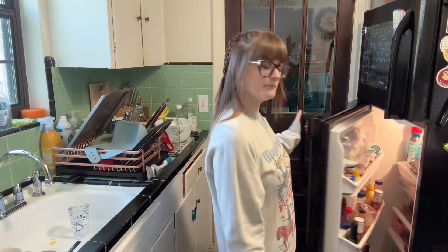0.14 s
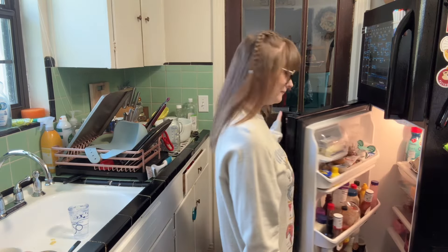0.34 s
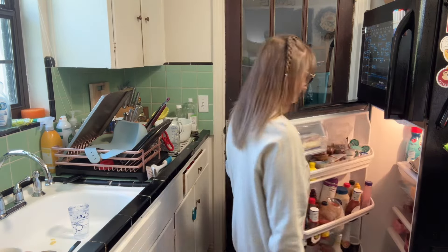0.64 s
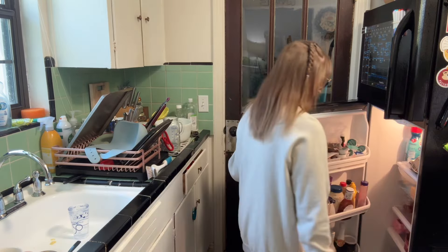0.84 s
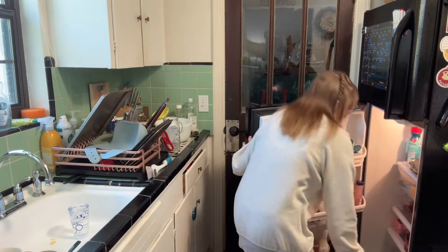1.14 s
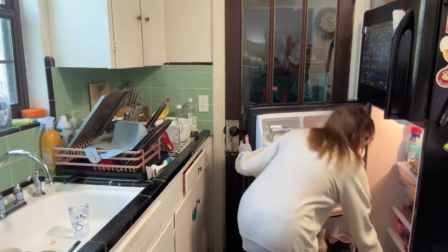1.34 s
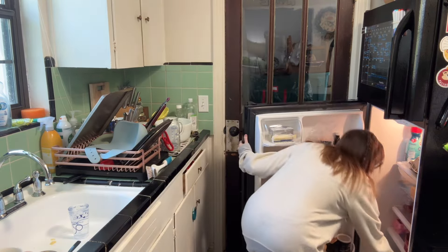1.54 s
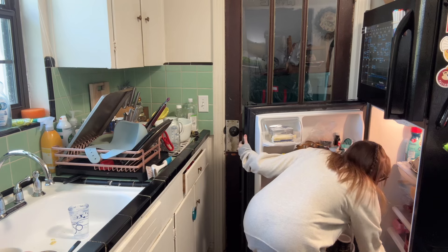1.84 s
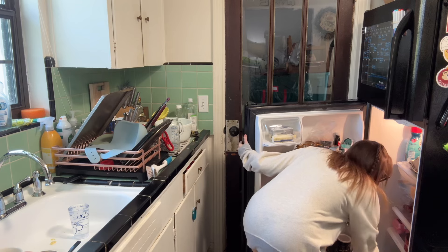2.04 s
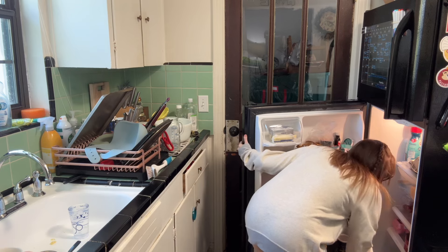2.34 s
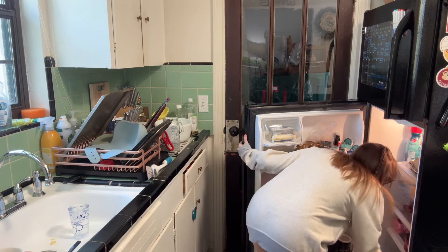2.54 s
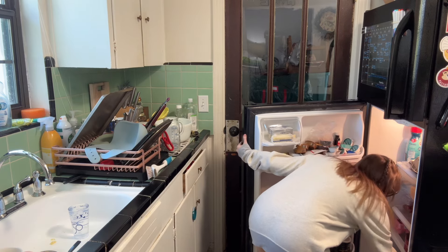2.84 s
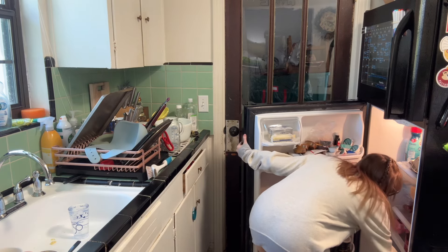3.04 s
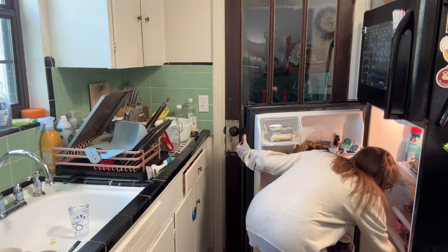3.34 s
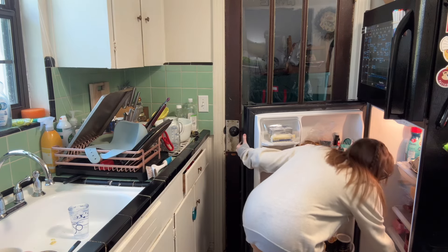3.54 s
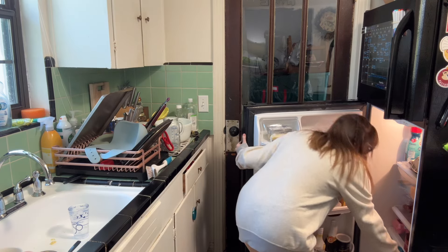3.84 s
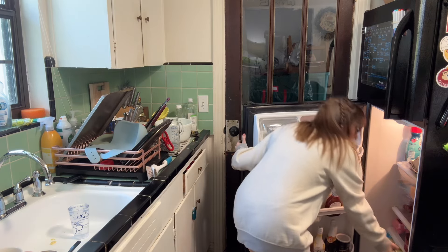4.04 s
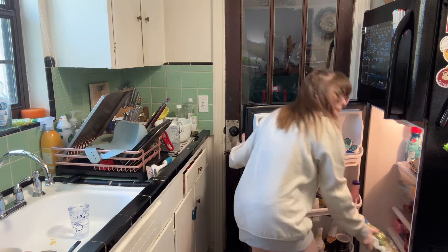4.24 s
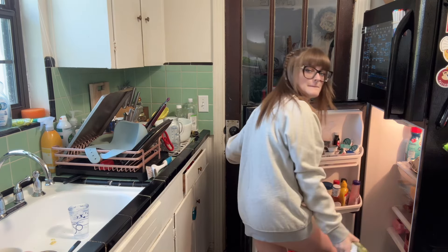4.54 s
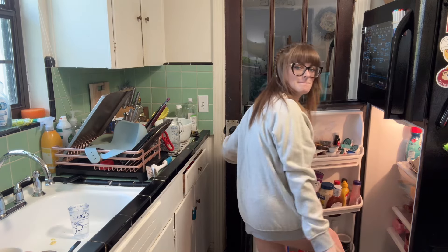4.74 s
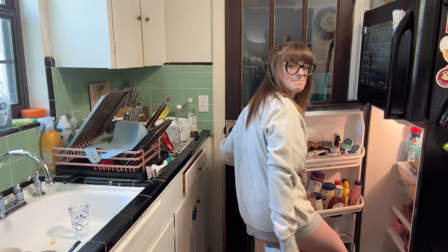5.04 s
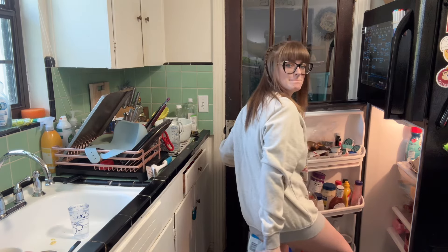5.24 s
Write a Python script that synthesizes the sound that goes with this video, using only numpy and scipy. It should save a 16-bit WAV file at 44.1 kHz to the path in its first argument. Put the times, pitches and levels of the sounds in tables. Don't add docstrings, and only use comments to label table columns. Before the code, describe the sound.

Close, slightly overloaded pickup of someone rummaging in an open fridge, with a short kitchen echo and a quiet compressor hum. Soft glass clinks and a jar rattle come first, then a loud plastic drawer bang and scraping, dense crackling of plastic bags with sharp pops, a second heavy knock, and finally light lid clicks and boxes sliding.

```python
import sys
import numpy as np
from scipy import signal
from scipy.fft import rfft, irfft
from scipy.io import wavfile

SR = 44100
rng = np.random.default_rng(int(sys.argv[2]) if len(sys.argv) > 2 else 0)


def to_wav(sig):
    pcm = np.clip(np.atleast_2d(sig), -1, 1) * 32767
    pcm = np.round(pcm).astype(np.int16)
    wavfile.write(sys.argv[1], SR, pcm.T)


def ratio(d):
    e = np.asarray(d, float) / 20
    return 10 ** e


N = 238253

# (frequency [Hz], density [dB per Hz])
HUM_SPECTRUM = [(11, -20), (18, 10.5), (45, -1), (88, -23), (196, -10), (300, -16.5), (788, -17.5),
                (1110, -26), (2670, -30.5), (5280, -41), (7860, -42), (14700, -47), (16000, -58)]
HUM_DB, WHINE_HZ, WHINE_DB = -48, 1166, -69

# (time [s], ring [dB], shrill [dB], rattle t60 [s])
JAR_CLINKS = [
    (.182, -38, -43.5, 0.14),
    (.355, -34.5, -43, 0.24),
]
# (time [s], ring [dB], shrill [dB], rattle t60 [s])
SHELF_JOLT = [
    (.743, -18, -31, 0.2),
]
# (frequency [Hz], level [dB], t60 [s])
FIRST_JAR_MODES = [(1700, -3, .07), (1800, 4, .1), (2300, -13, .05), (3080, -3, .09), (5300, -15, .04),
                   (8000, -9, .04)]
# (frequency [Hz], level [dB], t60 [s])
SECOND_JAR_MODES = [(1750, -7, .07), (2000, -6, .08), (2380, -1, .08), (2480, -4, .07), (3500, -4, .07),
                    (7500, -9, .05), (8000, -6, .06)]
# (frequency [Hz], level [dB], t60 [s])
SHELF_JAR_MODES = [(765, 2, 0.1), (1080, 2, 0.081), (1190, -15.5, 0.073), (1246, 7.5, 0.026),
                   (1290, -16, 0.055), (1600, 10.5, 0.073), (1560, -24, 0.13), (1830, 0, 0.075),
                   (2110, 4, 0.051), (2320, -20, 0.091), (2790, 6, 0.071), (2800, -13, 0.08),
                   (2990, 3, 0.026), (3560, -3.5, 0.11), (3770, -2, 0.043), (4100, -5, 0.14)]

# (start [s], hold [s], scrape [dB], cabinet rumble over scrape [dB])
DRAG_STROKES = [(0.2, 0.77, -55.5, -1.5), (1.1, 0.31, -66, 10.5), (1.69, .1, -27.5, 5.5),
                (1.8, 0.6, -37.5, -6), (2.03, 0.23, -40.5, 4.5), (2.3, 0.13, -41.5, 14),
                (2.68, 0.2, -37, 1), (2.79, 0.094, -35.5, -12.5), (2.9, 0.15, -35.5, -20),
                (3.15, 0.41, -30, -17), (3.6, .35, -48, 5), (4.0, 0.87, -60.5, 4.5), (4.82, 0.025, -34, 1),
                (4.85, .17, -33, 3), (5.05, 0.28, -36.5, -7), (5.17, 0.18, -33, -2.5), (5.29, .12, -41, -1)]
# (start [s], hold [s], rustle [dB], sheen over rustle [dB])
RUSTLE_STROKES = [(0.2, 0.12, -70.5, 10), (.78, 0.038, -49, -20), (.9, 0.72, -67.5, 8.5),
                  (1.57, .06, -54, -16), (1.76, 0.56, -33.5, -2.5), (2.38, 0.12, -45.5, 4),
                  (2.66, 0.19, -41, 4.5), (2.79, 0.13, -32.5, 3.5), (2.98, 0.19, -36, 6),
                  (3.12, 0.36, -31.5, 3), (3.48, 0.11, -33, 2.5), (3.7, 0.27, -55.5, 10),
                  (4.1, 0.58, -55, -3), (4.79, 0.056, -48, -20), (4.85, 0.3, -41, -22),
                  (4.97, 0.3, -33.5, -26), (5.11, 0.24, -32, -17)]
STROKE_ATTACK_S, STROKE_RELEASE_DB_PER_S, STILL_DB = 0.036, 151.5, -90

# (time [s], crack [dB], box [dB], tray [dB], cabinet [dB])
KNOCK_BLOWS = [(1.5482, -24.5, -14.5, -25.5, -4), (1.7, -15, -18.5, -50, -24), (1.7393, 1, -4, -10, -8),
               (1.758, -3, -6, -33, -33), (1.7845, -29, -7, -16, -19), (1.828, -27, -27, -14, -16),
               (2.145, -26.5, -29, -47, -29), (2.3509, -10, -8.5, -25.5, -48),
               (2.3652, -12, -23, -22, -23.5), (2.3926, -61, -20, -30, -39),
               (2.642, -24, -15.5, -14.5, -32), (2.942, -16, -52, -32, -48),
               (3.064, -26.5, -21.5, -29, -34.5), (3.1078, -19.5, -18, -26, -53),
               (3.4827, 0, -2.5, -5.5, -18.5), (3.514, -28, -14, -15.5, -20),
               (3.7362, -47, -23.5, -28.5, -31), (3.8436, -35, -28.5, -31.5, -56),
               (4.6322, -42, -41, -38.5, -28), (4.8563, -61, -22.5, -24, -38), (4.9268, -45, -18, -23, -32),
               (5.1569, -31, -22.5, -22, -51), (5.184, -53, -37, -23, -23.5)]
KNOCK_T60_S = 0.12
# (frequency [Hz], density [dB per Hz])
CRACK_SPECTRUM = [(240, -37.5), (400, -23.5), (921, -3), (1230, -11), (1870, -5), (2120, -5), (4800, -10),
                  (7630, -9), (16000, -25.5)]
# (frequency [Hz], level [dB], t60 [s])
BOX_MODES = [(516, -4.5, 0.04), (560, -10, 0.084), (607.4, -6.5, 0.061), (678, -3.5, 0.051),
             (766, -1, 0.03), (802, -0.5, 0.031), (915, -8, 0.073), (950, -12.5, 0.065), (972, -6.5, 0.054),
             (1116, -5.5, 0.032), (1245, -14.5, 0.054), (1297, -13, 0.096), (1462, -6.5, 0.027),
             (1532, -13, 0.059), (1549, -13, 0.046), (1670, -18, 0.029), (2320, -17.5, 0.024)]
# (frequency [Hz], level [dB], t60 [s])
TRAY_MODES = [(172, -3, 0.07), (208.4, -1.5, 0.2), (247.3, -7.5, 0.23), (287.5, -0.5, 0.12),
              (336, -4.5, 0.16), (379, -11, 0.19), (430.7, -4, 0.1)]
# (frequency [Hz], level [dB], t60 [s])
CABINET_MODES = [(63.5, -31, 0.16), (79, -19.5, 0.45), (100.7, -3.5, 0.26), (129, 0, 0.18),
                 (211.4, -5.5, 0.2)]

# (frequency [Hz], density [dB per Hz])
FILM_SPECTRUM = [(900, -25), (1500, -3), (3000, -1), (5000, 0), (7000, 0), (9000, -3), (12000, -13),
                 (16000, -21)]
PRICKS_PER_S, PRICK_OVER_SHEEN_DB = 160, 10
# (time [s], level [dB], centre [Hz])
LID_CLICKS = [
    (0.572, -37, 1920),
    (1.0198, -43, 2720),
    (1.422, -20, 1940),
    (4.1833, -29, 1940),
    (4.284, -25.5, 2770),
    (4.504, -41, 2420),
    (4.53, -31, 2590),
    (4.5817, -25, 3430),
    (4.6068, -26, 4150),
    (5.22, -28, 4170),
]
# (time [s], level [dB], centre [Hz])
BAG_SNAPS = [(2.5756, -46, 7290), (2.6978, -20, 6100), (2.7292, -43, 8200), (2.7561, -25, 5900),
             (2.7871, -19, 6500), (2.8265, -20, 4930), (2.8674, -17, 8050), (2.944, -4, 4430),
             (3.022, -14.5, 8400), (3.1096, -7, 8050), (3.1542, -10, 6030), (3.1864, -19.5, 6640),
             (3.2296, -13, 5730), (3.244, -18, 5440), (3.2879, -24, 8350), (3.311, -17, 5760),
             (3.4291, -10, 8150), (3.5956, -21, 7100), (3.6576, -28.5, 5460), (3.6794, -47, 6020),
             (3.8277, -27.5, 5950), (3.8433, -12, 6390), (3.916, -20.5, 6700), (4.0085, -26.5, 5600),
             (4.0335, -46, 6300), (4.1639, -45.5, 5800)]
# (time [s], level [dB], centre [Hz])
BOX_SCUFFS = [
    (4.855, -23.5, 1870),
    (4.924, -17.5, 2430),
]
SNAP_T60_S, CLICK_T60_S, SCUFF_T60_S = 0.12, 0.037, 0.28
SHORTENS_PER_DB = 0.0748
# (time [s], level [dB], length [s])
SWISHES = [
    (1.176, -47, 0.1),
    (1.623, -53.5, 0.052),
    (2.135, -30.5, 0.056),
    (3.365, -31, 0.062),
    (4.581, -58, 0.1),
    (5.103, -42, 0.076),
]
# (time [s], peak [dB])
EDGE_TICKS = [
    (2.9455, -10),
    (3.0236, -4),
    (3.1096, -6),
    (3.1545, -18),
    (3.8432, -12),
    (3.9165, -20),
    (4.2845, -37),
]

# (frequency [Hz], t60 [s])
KITCHEN_DECAY = [(100, 0.79), (600, 0.31), (2500, 0.3), (8000, 0.11), (16000, 0.25)]
KITCHEN_DB = -13.5


def rms_one(x):
    return x / np.sqrt(np.mean(x ** 2) + 1e-20)


def at_hz(points, hz):
    table_hz, value = np.transpose(points)
    return np.interp(np.log(hz + 1), np.log(table_hz), value)


def colour(x, spectrum):
    log_level = at_hz(spectrum, np.arange(2049) * SR / 4096) * np.log(10) / 20
    cepstrum = irfft(log_level)
    cepstrum[1:2048] *= 2
    cepstrum[2049:] = 0
    pulse = irfft(np.exp(rfft(cepstrum)))
    return signal.oaconvolve(x, pulse / np.linalg.norm(pulse))[:N]


def band(x, low_hz, high_hz):
    edges_hz = [low_hz, min(high_hz, 0.45 * SR)]
    return signal.sosfilt(signal.butter(2, edges_hz, "band", fs=SR, output="sos"), x)


def drift(rate_hz):
    knots = rng.standard_normal(2000)
    return np.interp(np.arange(N) / SR * rate_hz, np.arange(len(knots)), knots)


def grains(count, spread_db):
    sizes = ratio(spread_db * np.minimum(rng.exponential(1, count), 5))
    return rms_one(sizes * rng.standard_normal(count))


def rattle(time_s, db, t60_s, rise_s=0.0012):
    out = np.zeros(N)
    for start_s, level_db, decay_s in zip(time_s, db, np.clip(t60_s, 0.004, 0.5)):
        first = round(start_s * SR)
        t = np.arange(N - first)[:SR // 2] / SR
        out[first:first + len(t)] += ratio(level_db - 60 * t / decay_s) * (1 - np.exp(-t / rise_s))
    return out


def first_touch(time_s, db):
    out = np.zeros(N)
    out[np.round(np.asarray(time_s) * SR).astype(int) + 8] = ratio(db)
    return out


def body(drive, modes, spread_db, flip=-1):
    out = np.zeros(N)
    for k, (hz, db, t60_s) in enumerate(modes):
        r = ratio(-60 / (np.clip(t60_s, 0.02, 0.3) * SR))
        w = 2 * np.pi * hz / SR
        push = drive * ratio(db + spread_db * drift(17)) * flip ** k + 1e-18
        out += signal.lfilter([0, np.sin(w)], [1, -2 * r * np.cos(w), r * r], push)
    return out


def strokes(rows):
    start_s, hold_s, db, second_db = np.transpose(rows)[:, :, None]
    t = np.arange(0, N, 64) / SR
    swell = np.clip((t - start_s) / STROKE_ATTACK_S, 0, 1)
    shape = swell * ratio(-STROKE_RELEASE_DB_PER_S * np.maximum(t - start_s - hold_s, 0))
    levels_db = []
    for peak_db in (db, db + second_db):
        power = np.sum((shape * ratio(peak_db)) ** 2, axis=0) + ratio(STILL_DB) ** 2
        levels_db.append(np.interp(np.arange(N) / SR, t, 10 * np.log10(power)))
    return levels_db


def compressor():
    hum = ratio(HUM_DB + drift(3)) * colour(rng.standard_normal(N), HUM_SPECTRUM)
    whine = np.sin(2 * np.pi * WHINE_HZ * np.arange(N) / SR)
    return hum + ratio(WHINE_DB + 3.0 * drift(2.4)) * whine


def clinks(events, modes, ring_share_db):
    time_s, ring_db, shrill_db, t60_s = np.transpose(events)
    touch = grains(N, 2.55)
    drive = rattle(time_s, ring_db, t60_s) * touch + first_touch(time_s, ring_db + 21.0)
    ring = body(ratio(ring_share_db) * drive, modes, spread_db=-2.0)
    tick = band(drive, 670, 2670)
    shrill = rattle(time_s, shrill_db + 1.0, t60_s) * touch
    shrill = band(band(shrill, 6800, 10000), 6300, 10800)
    return ring + tick + shrill


def jars():
    first = clinks(JAR_CLINKS[:1], FIRST_JAR_MODES, ring_share_db=-35)
    second = clinks(JAR_CLINKS[1:], SECOND_JAR_MODES, ring_share_db=-35)
    return first + second + clinks(SHELF_JOLT, SHELF_JAR_MODES, ring_share_db=-44)


def runners(scrape_db, judder):
    return band(ratio(scrape_db + 5) * judder * grains(N, 5.3), 150, 1500)


def boxes(scrape_db, judder):
    time_s, _, box_db, _, _ = np.transpose(KNOCK_BLOWS)
    t60_s = np.full(len(time_s), KNOCK_T60_S)
    drive = rattle(time_s, box_db - 34, 1.62 * t60_s) + ratio(scrape_db - 29.5) * judder
    drive = drive * grains(N, 2.13) + first_touch(time_s, box_db - 8.5)
    return body(drive, BOX_MODES, spread_db=4.0)


def shelf_tray(rumble_db, judder):
    time_s, _, _, tray_db, _ = np.transpose(KNOCK_BLOWS)
    t60_s = np.full(len(time_s), KNOCK_T60_S)
    drive = rattle(time_s, tray_db - 33, 1.17 * t60_s) + ratio(rumble_db - 37.5) * judder
    push = rattle(time_s, tray_db - 33.5, 0.15 * t60_s)
    return body(drive * grains(N, 3.1) + push, TRAY_MODES, spread_db=2.0)


def cabinet(rumble_db):
    time_s, _, _, _, cabinet_db = np.transpose(KNOCK_BLOWS)
    t60_s = np.full(len(time_s), KNOCK_T60_S)
    push = rattle(time_s, cabinet_db - 27.0, 0.075 * t60_s, rise_s=0.00054)
    shake = ratio(rumble_db - 15.5) * band(rng.standard_normal(N), 46.4, 83.5)
    panels = body(shake - push, CABINET_MODES, spread_db=2.0, flip=0.74)
    return band(band(panels, 55, 900), 50, 900)


def bag_rustle(film, rustle_db, sheen_db):
    clumps = ratio(2.4 * drift(45) + 1.8 * drift(160))
    dull = signal.lfilter(*signal.butter(1, 5500, fs=SR), film)
    rustle = ratio(rustle_db - 6.0) * dull * clumps ** 0.45
    sheen = ratio(sheen_db - 3.0) * clumps * (film - dull)
    pricks = (rng.random(N) < PRICKS_PER_S / SR) * rng.standard_normal(N)
    return rustle + sheen + band(ratio(sheen_db + PRICK_OVER_SHEEN_DB) * pricks, 3800, 15000)


def snaps(events, usual_t60_s):
    out = np.zeros(N)
    touch = grains(N, 2.0)
    for time_s, db, hz in events:
        t60_s = usual_t60_s * np.exp(-SHORTENS_PER_DB * (db + 27.5))
        first = round(time_s * SR)
        at = slice(first, first + SR // 4)
        snap = rattle([time_s], [db - 3.5], [t60_s], rise_s=0.0014) * touch
        snap = (snap + first_touch([time_s], [db - 1.5]))[at]
        out[at] += band(band(snap, 0.3 * hz, 1.58 * hz), 300, 3.44 * hz)
    return out


def swishes(film):
    out = np.zeros(N)
    t = np.arange(N) / SR
    for time_s, db, length_s in SWISHES:
        progress = np.clip((t - time_s) / length_s, 0, 1)
        out += ratio(db) * np.sin(np.pi * progress ** 0.65) ** 2 * film
    return out


def knock_cracks():
    time_s, crack_db, _, _, _ = np.transpose(KNOCK_BLOWS)
    envelope = rattle(time_s, crack_db - 4.5, np.full(len(time_s), KNOCK_T60_S))
    return colour(envelope * grains(N, 3.2), CRACK_SPECTRUM)


def edge_ticks():
    return band(first_touch(*np.transpose(EDGE_TICKS)), 1500, 15000)


def kitchen(x):
    t, white = np.arange(SR // 2) / SR, rng.standard_normal(SR // 2)
    tail = np.zeros(len(t))
    for hz in 62.5 * 2 ** np.arange(9):
        octave = band(white, hz / np.sqrt(2), hz * np.sqrt(2))
        tail += octave * ratio(-60 * t / at_hz(KITCHEN_DECAY, hz))
    tail = band(tail * (t > 0.005), 120, 19000)
    return signal.oaconvolve(x, tail / np.linalg.norm(tail))[:N]


def scene():
    hum = compressor()
    scrape_db, rumble_db = strokes(DRAG_STROKES)
    judder = ratio(2.1 * drift(30))
    film = colour(grains(N, 0.78), FILM_SPECTRUM)
    near = jars() + runners(scrape_db, judder) + boxes(scrape_db, judder)
    near += shelf_tray(rumble_db, judder) + cabinet(rumble_db)
    near += bag_rustle(film, *strokes(RUSTLE_STROKES))
    near += snaps(LID_CLICKS, CLICK_T60_S) + snaps(BAG_SNAPS, SNAP_T60_S) + snaps(BOX_SCUFFS, SCUFF_T60_S)
    near += swishes(film) + knock_cracks() + edge_ticks()
    return (near + ratio(KITCHEN_DB) * kitchen(near) + hum)[None]


def band_limit(x):
    return signal.sosfilt(signal.butter(12, 16330, fs=SR, output="sos"), x)


def record(dry):
    return band_limit(np.clip(dry, -1, 1))


dry = scene()
out = record(dry)
to_wav(out)
```